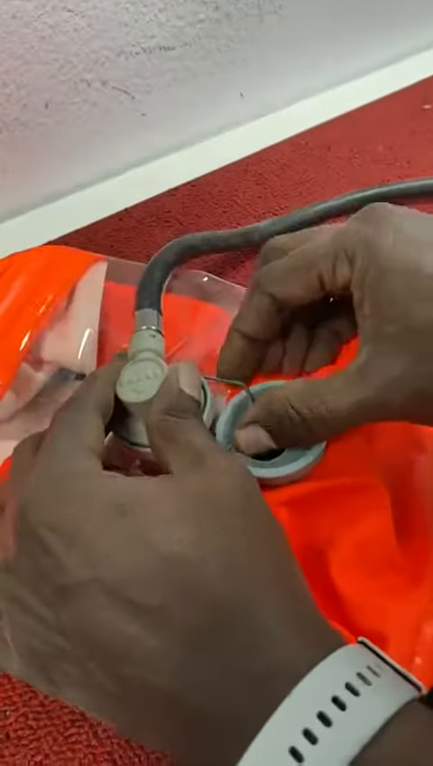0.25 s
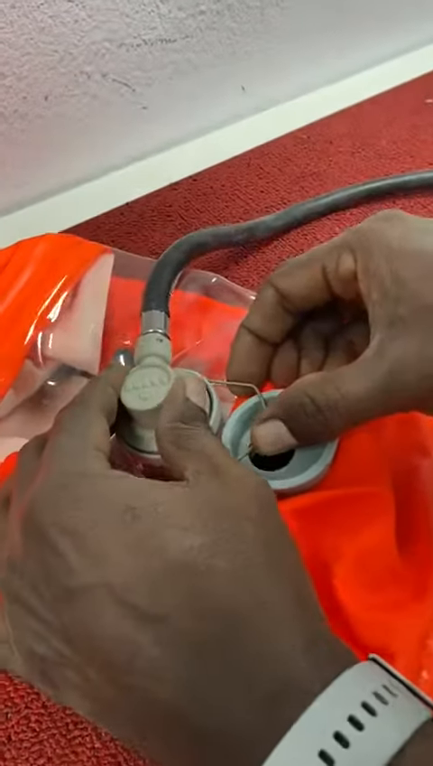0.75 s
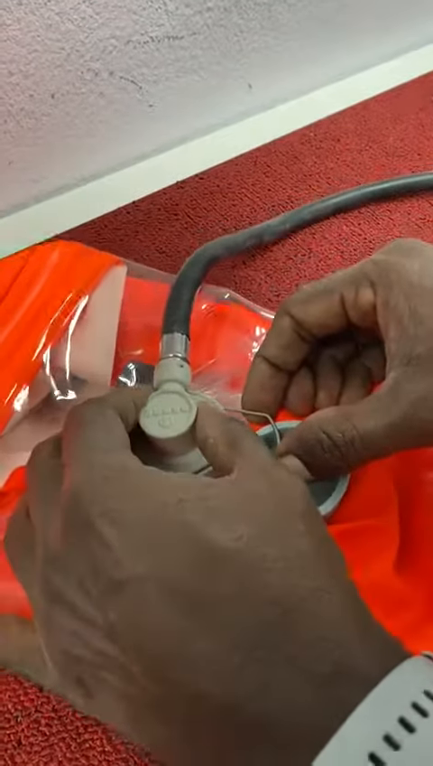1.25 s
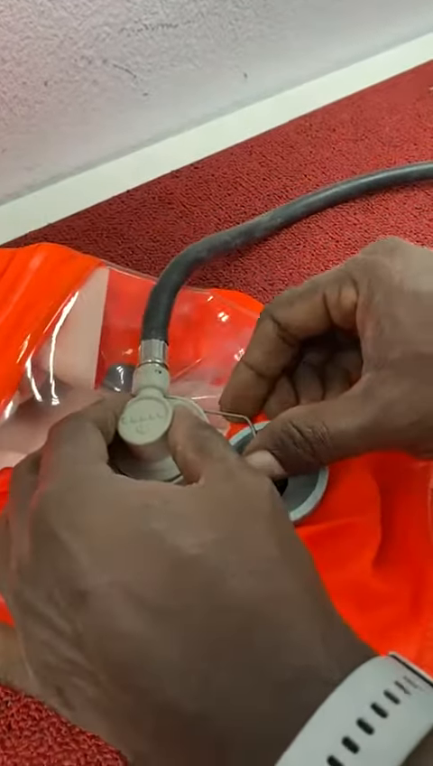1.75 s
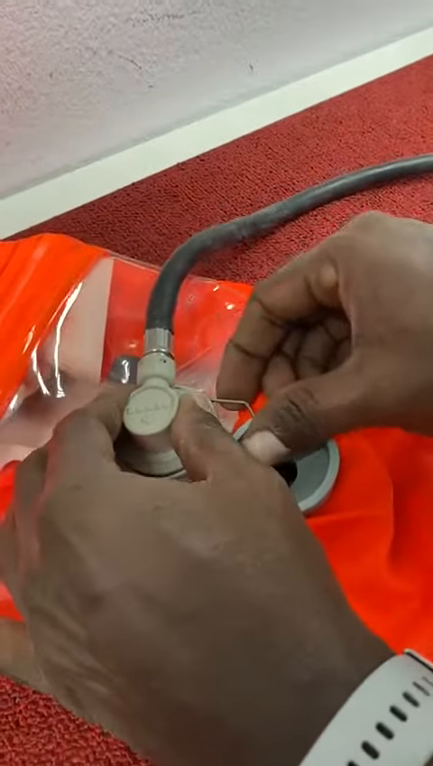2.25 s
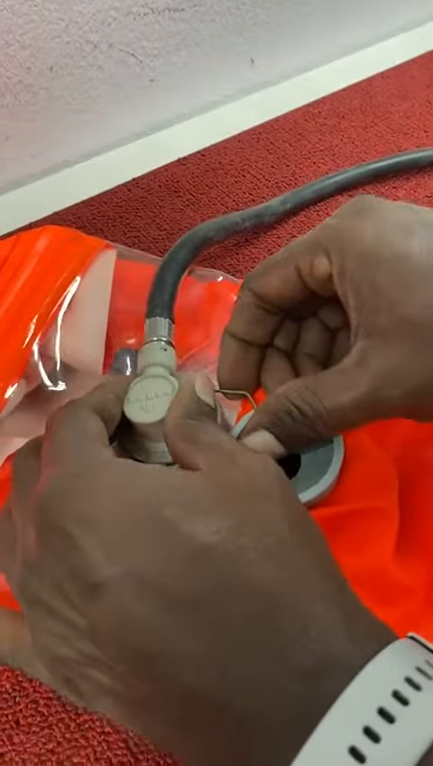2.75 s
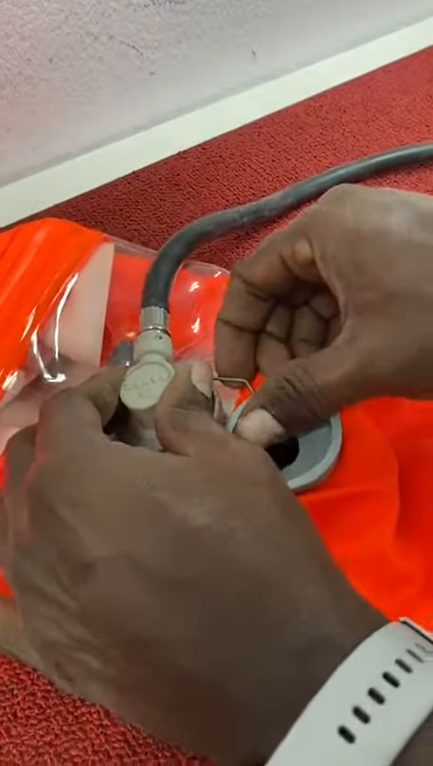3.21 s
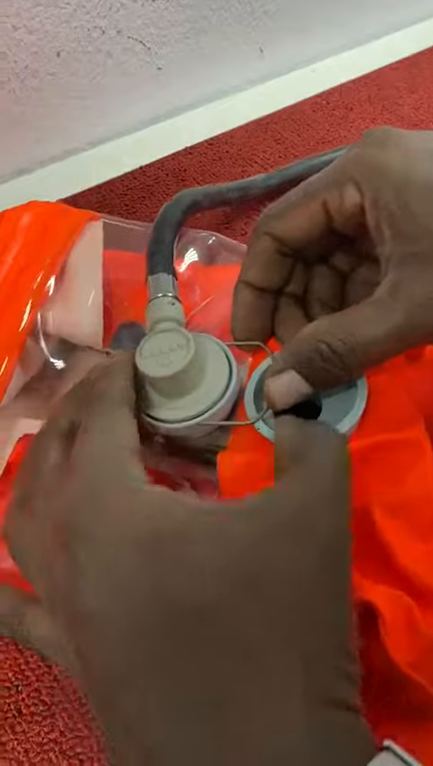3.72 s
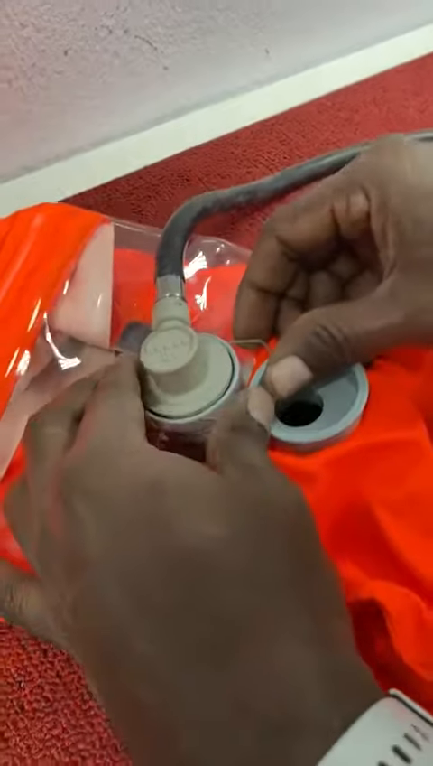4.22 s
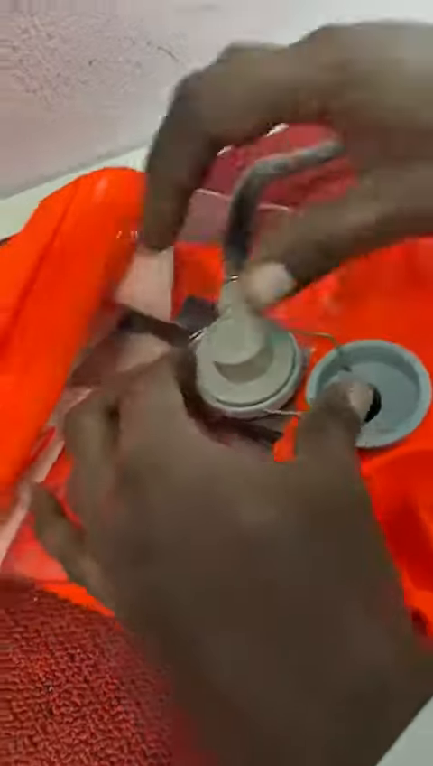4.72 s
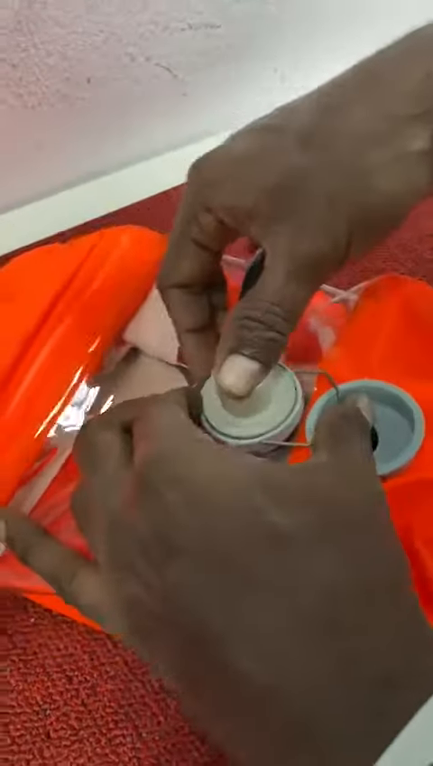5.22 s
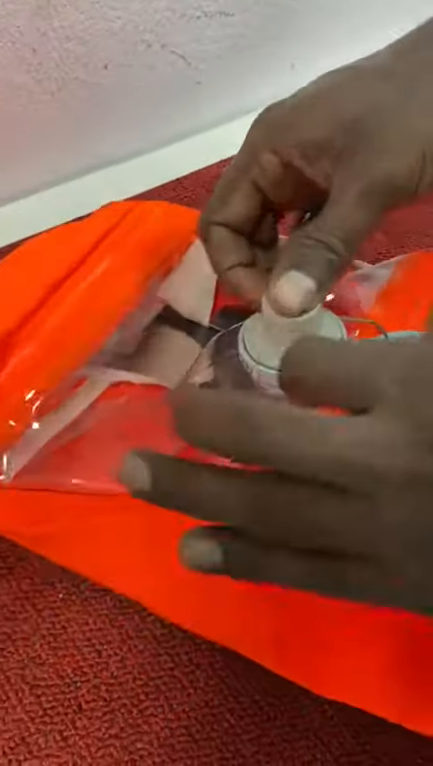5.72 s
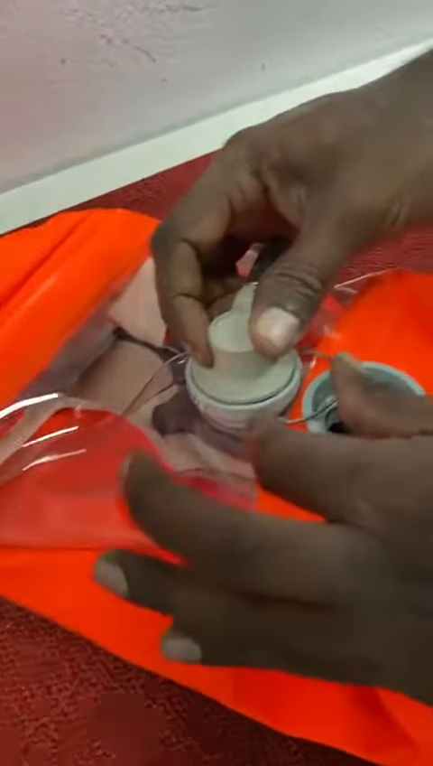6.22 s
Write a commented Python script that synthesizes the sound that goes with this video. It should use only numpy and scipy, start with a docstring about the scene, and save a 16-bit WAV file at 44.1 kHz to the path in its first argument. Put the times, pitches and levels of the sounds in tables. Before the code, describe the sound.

A low ventilation hum fills a carpeted room for the whole six and a half seconds. It holds its pitch but swells and fades unevenly, over a deeper drone and a steady bed of air rumble and hiss. It dips around 1 second and is strongest from about 3.5 to 5.5 seconds, when a faint high whir joins it.

Close to the microphone, hands work a plastic valve on an inflatable vest. A soft knock and slight vinyl rustle come at 1.3 seconds. At 1.9 seconds a wire clip gives a sharp, dry click, the most prominent sound. A faint knock and tick follow near 3.4 and 3.8 seconds. Light plastic knocks cluster between 4.5 and 5 seconds, then a second, quieter click lands at 5.2. A soft knock and tiny squeak follow around 5.5, and a faint rustle at 6. Finger brushes on the fabric are barely audible.

```python
"""Ventilation hum and a vest valve

A ventilation machine hums in a carpeted room; its low tones swell and fade as the microphone
shifts through the standing waves. Under it lies a steady bed of air rumble and hiss.
Close by, hands work a plastic valve on an inflatable vest: a wire clip ticks, the plastic
parts knock and squeak softly, the vinyl rustles and fingers brush the coated fabric."""
import sys
import numpy as np
from scipy import signal
from scipy.fft import rfft, irfft, next_fast_len
from scipy.io import wavfile
from scipy.ndimage import uniform_filter1d, map_coordinates

SR = 44100
rng = np.random.default_rng(int(sys.argv[2]) if len(sys.argv) > 2 else 0)


def unload_wav(signal):
    """Save mono or channel-first audio to the path in sys.argv[1] as 16-bit WAV at rate SR, clipped to [-1, 1]."""
    wavfile.write(
        sys.argv[1],
        SR,
        np.round(np.clip(np.atleast_2d(signal).T, -1, 1) * 32767).astype(np.int16),
    )


N = 284886

# swells of the main tone in the room's standing waves: t/s, level/dB
HUM_SWELLS = [(0, -32.5), (0.12, -33.5), (0.32, -42.5), (0.42, -31), (0.54, -42), (0.72, -35), (0.85, -60),
              (1.16, -46), (1.32, -36), (1.46, -42.5), (1.55, -32.5), (1.66, -34), (1.76, -40),
              (1.88, -29.5), (2.25, -34), (2.38, -39), (2.56, -39.5), (2.66, -37), (2.85, -31.5),
              (3.1, -30.5), (3.35, -30), (3.58, -27.5), (3.85, -31), (4.12, -27), (4.3, -27.5), (4.47, -34),
              (4.62, -26.5), (4.85, -28), (5.14, -26), (5.33, -27.5), (5.48, -25.5), (5.6, -30.5),
              (5.76, -28.5), (5.86, -34.5), (5.97, -41), (6.08, -39.5), (6.2, -35), (6.3, -44), (6.46, -33)]
# swells of its octave, whose standing waves lie elsewhere: t/s, level/dB
OCTAVE_SWELLS = [(0.0, -54.5), (.3, -43), (0.58, -43), (.8, -42), (1.06, -56), (1.32, -46), (1.78, -53),
                 (1.95, -45.5), (2.26, -40), (2.46, -57), (2.62, -64), (2.74, -46.5), (3.1, -40.5),
                 (3.52, -43), (3.7, -46.5), (4.24, -49), (4.58, -44), (4.76, -53), (5.1, -43),
                 (5.32, -54.5), (5.7, -40), (6.1, -39.5), (6.2, -59), (6.36, -39), (6.46, -42)]
# swells of the deeper drone: t/s, level/dB
DRONE_SWELLS = [(0, -49), (.4, -39.5), (.7, -46.5), (1.02, -37), (1.22, -45.5), (1.48, -36), (1.86, -47),
                (2.04, -31), (2.22, -60), (2.98, -46.5), (3.16, -35), (3.54, -39.5), (3.68, -53.5),
                (4.06, -36), (4.28, -47), (4.48, -33), (4.72, -43.5), (4.92, -34), (5.26, -44.5),
                (5.55, -38.5), (5.85, -45), (6.0, -32.5), (6.22, -42), (6.46, -40.5)]

# ticks of the wire clip: t/s, snap level/dB, body level/dB
CLIP_TICKS = [(1.9011, -14.5, -6.5), (1.908, -33.5, -14), (1.911, -33, -21.5), (3.8022, -43, -42.5),
              (4.5696, -33, -47), (4.939, -39, -41), (5.2034, -25, -9.5)]
# bright snap of the wire: f/Hz, gain/dB
SNAP_EQ = [(2500, -4), (3800, 1.5), (5100, 7), (5900, 1.5), (6500, 0), (7200, -7), (8200, 0.5), (9400, 0),
           (10400, 3), (11200, -3), (11900, -16)]
# dry crack of the valve body: f/Hz, gain/dB
BODY_EQ = [(400, -2), (800, -1), (1500, -0.5), (2200, 0), (3700, -3.5), (5100, -6), (6300, -17),
           (8000, -29.5)]
# soft knocks of the plastic parts: t/s, level/dB, f/Hz, attack/s
VALVE_KNOCKS = [(1.3285, -27, 564, 0.0011), (1.348, -41, 780, 0.00085), (3.445, -37, 641, 0.0015),
                (4.47, -32, 630, .0012), (4.507, -35.5, 850, 0.0028), (4.559, -42, 1000, 0.0023),
                (4.584, -38, 860, .002), (4.815, -39, 640, 0.0022), (4.836, -35, 606, 0.0019),
                (4.865, -35, 580, .002), (4.936, -35, 890, 0.0029), (5.462, -36, 580, 0.0014)]
# modes of the plastic: multiple of the knock's pitch, gain/dB
PLASTIC_MODES = [(.6, 4), (1, 7), (1.37, -10), (2.1, -27.5)]
# plastic slipping on plastic: t/s, half-length/s, level/dB, f/Hz
VALVE_SQUEAKS = [(5.575, 0.0077, -40, 800)]
# the vinyl shifting under the hands: t/s, half-length/s, level/dB
VINYL_RUSTLES = [(1.343, 0.034, -54), (4.547, 0.035, -71), (4.67, 0.025, -49.5), (5.223, 0.043, -57),
                 (5.45, 0.034, -61), (6.055, 0.021, -48)]
# colour of the flexing vinyl: f/Hz, gain/dB
VINYL_EQ = [(1200, -19.5), (2000, -10.5), (2650, 1.5), (3050, 2), (3350, -4.5), (4200, -12.5),
            (5500, -31.5), (7000, -78)]
# finger strokes on the fabric: t/s, half-length/s, level/dB
FINGER_BRUSHES = [(0.396, 0.35, -75.5), (1.506, 0.19, -80.5), (1.95, 0.05, -75.5), (3.378, 0.033, -71),
                  (3.794, 0.019, -65.5), (3.972, 0.013, -71), (4.585, 0.047, -69.5), (4.875, 0.14, -75),
                  (5.577, 0.13, -75)]

# duct rumble: f/Hz, gain/dB
RUMBLE_EQ = [(20, -25.5), (36, -14.5), (48, -6), (75, 1), (102, -3), (130, 2.5), (162, 0), (210, -5.5),
             (280, -5), (345, -10.5), (420, -18), (600, -31), (1000, -86.5)]
# grille hiss: f/Hz, gain/dB
HISS_EQ = [(250, -15.5), (450, 7.5), (760, 6.5), (900, 5), (1200, 7), (1350, 4), (2100, 2.5), (2700, 5.5),
           (3050, 4.5), (3400, 2), (4200, -5.5), (5200, -10.5), (6200, -19), (7300, -90.5)]
# whir around 3 kHz: f/Hz, gain/dB
WHIR_EQ = [(2480, -19.5), (2600, -5), (2680, 3.5), (2780, 2.5), (2860, -4.5), (2960, 5.5), (3060, 2),
           (3170, 0.5), (3270, -17), (3600, -54.5)]
# rise and fall of the whir: t/s, level/dB
WHIR_SWELL = [(0, -68), (3.2, -65.5), (3.8, -55.5), (4.7, -55), (5.3, -55.5), (6.2, -56.5), (6.46, -67)]
# top-end fizz of both the air and the fingers: f/Hz, gain/dB
FIZZ_EQ = [(5000, -26.5), (7500, -29), (8500, 2), (9200, 11.5), (10200, 9.5), (11200, 5), (11900, -6.5)]
# thin hiss, in opposite phase left and right: f/Hz, gain/dB
WIDE_EQ = [(5400, -34), (5900, 3), (6400, 3), (7500, 0.5), (8800, -3.5), (9300, -25), (9700, -37.5)]
# faint, narrow resonances of the machine: f/Hz, width/Hz, level/dB
RESONANCES = [(47, 13, -49), (66.2, 10, -47), (187.3, 8.3, -47.5), (234.8, 6.6, -53.5), (342.8, 12, -56.5),
              (433, 20, -58.5), (744, 100, -62), (798.5, 16, -59), (1019, 12, -69), (1232, 25, -62),
              (1460, 27, -64), (1959, 22, -63), (2665, 45, -65.5), (2960, 25, -59.5), (3134, 40, -69.5)]

# how alike the room noise is left and right: f/Hz, correlation
ROOM_CORRELATION = [(70, 1), (100, .99), (190, .96), (280, .93), (400, .75), (600, .56), (950, .58),
                    (1350, .42), (2060, .6), (3000, .58), (4500, .56), (5400, .9), (9500, .99)]
# balance of the room noise: f/Hz, left minus right/dB
ROOM_BALANCE = [(110, -.2), (190, .3), (350, -4.5), (600, -4), (1100, 1), (3500, .8), (6400, 0)]
# bands of the machine that arrive on the left first: f/Hz, phase lead/rad
LEFT_LEAD = [(70, 0), (145, .03), (300, .08), (700, .7), (950, .4), (1650, 1.25), (2030, .45), (2400, 1.35),
             (3100, 1.45), (4500, .8), (5500, 0)]


def machine_hum(pitch_hz=145, drift_hz=0.31, flutter_db=1.5, octave_flutter_db=0.9):
    """Tone and octave share one nearly constant machine speed; each swells with its own standing waves."""
    phase = running_phase(pitch_hz + drift_hz * wobble(1.507)) + 0.027 * wobble(11)
    octave_phase = 2 * phase + 0.081 * wobble(22)
    main = amp(envelope(HUM_SWELLS) + flutter_db * wobble(15)) * unit(np.sin(phase))
    octave = amp(envelope(OCTAVE_SWELLS) + octave_flutter_db * wobble(12)) * unit(np.sin(octave_phase))
    return panned(main, lean_db=-1) + panned(octave, lean_db=-3.5)


def deep_drone(pitch_hz=87.16, wander_hz=2, waver_db=0.8):
    """A deep tone under the hum, wavering in pitch and strength."""
    phase = running_phase(pitch_hz + wander_hz * wobble(9))
    return amp(envelope(DRONE_SWELLS) + waver_db * wobble(9)) * unit(np.sin(phase))


def clip_ticks(rattle_db=-6.5, rattle_t60_s=0.0055, tail_db=-41, tail_t60_s=0.1):
    t = np.arange(SR // 8) / SR
    jolt = signal.unit_impulse(len(t))
    rattle = amp(rattle_db - 60 * t / rattle_t60_s) * (1 - np.exp(-t / 0.00033))
    tail = amp(tail_db - 60 * t / tail_t60_s)
    snaps, cracks = np.zeros(N), np.zeros(N)
    for start, snap_db, body_db in CLIP_TICKS:
        snap = jolt + (rattle + tail) * rng.standard_normal(len(t))
        crack = jolt + rattle * rng.standard_normal(len(t))
        add(snaps, start, amp(snap_db) * snap / np.linalg.norm(snap))
        add(cracks, start, amp(body_db) * crack / np.linalg.norm(crack))
    wire = filtered(snaps, lambda hz: amp(along(SNAP_EQ, hz)))
    body = filtered(cracks, lambda hz: 1j * amp(along(BODY_EQ, hz)))  # a quarter cycle off the wire
    return panned(wire + body, lean_db=0)


def valve_knocks(ring_t60_s=0.018, scuff_db=-7, scuff_t60_s=0.05):
    """Plastic parts knock and scuff, each with its own pitch and softness, all dying equally fast."""
    t = np.arange(SR // 8) / SR
    track = np.zeros(N)
    for start, db, pitch_hz, attack_s in VALVE_KNOCKS:
        ring = np.zeros(len(t))
        for ratio, mode_db in PLASTIC_MODES:  # higher modes die sooner
            decay = amp(mode_db + rng.normal(0, 1) - 60 * t * np.sqrt(ratio) / ring_t60_s)
            ring += decay * np.sin(2 * np.pi * pitch_hz * ratio * t)
        rub = amp(scuff_db - 60 * t / scuff_t60_s) * scuff(pitch_hz, len(t))
        attack = 1 - np.exp(-(t / attack_s) ** 2)
        add(track, start, amp(db) * attack * (ring + rub))
    return panned(track, lean_db=-5)


def valve_squeaks(waver_hz=60, rough_db=4, rub_db=-11):
    """The valve turns in its seat: a few rough stick-slip cycles inside a longer, dull rub."""
    track = np.zeros(N)
    for centre, half_s, db, pitch_hz in VALVE_SQUEAKS:
        phase = running_phase(pitch_hz + waver_hz * wobble(400))
        track += stroke(centre, half_s, db) * amp(rough_db * wobble(760)) * np.sin(phase)
        track += stroke(centre, 2 * half_s, db + rub_db) * scuff(pitch_hz, N)
    return panned(track, lean_db=-6)


def vinyl_rustles():
    """The vinyl flexes in soft swells of noise."""
    return sum(stroke(*row) for row in VINYL_RUSTLES) * room_noise(VINYL_EQ)


def finger_brushes(grain_db=3):
    """Skin slides over coated fabric in faint, grainy strokes."""
    friction = unit(amp(grain_db * wobble(250)) * room_noise(FIZZ_EQ))
    return sum(stroke(*row) for row in FINGER_BRUSHES) * friction


def airflow(rumble_db=-37, hiss_db=-45.5, fizz_db=-78.5, wide_db=-70):
    """The bed of moving air: duct rumble, grille hiss, a patchy whir and a thin, wide top."""
    rumble = amp(rumble_db + 1.5 * wobble(5)) * room_noise(RUMBLE_EQ)
    hiss = amp(hiss_db + 0.25 * wobble(13)) * room_noise(HISS_EQ)
    whir = amp(envelope(WHIR_SWELL) + wobble(4.1)) * patchy(room_noise(WHIR_EQ), depth_db=2.2)
    fizz = amp(fizz_db + 0.8 * wobble(11)) * room_noise(FIZZ_EQ)
    wide = amp(wide_db) * unit(filtered(rng.standard_normal(N), lambda hz: amp(along(WIDE_EQ, hz))))
    return rumble + hiss + whir + fizz + np.array([wide, -wide])


def machine_resonances():
    """The flow keeps the machine's narrow resonances ringing."""
    def peaks(hz):
        return np.sqrt(sum(amp(db) ** 2 / width / (1 + (2 * (hz - centre) / width) ** 4)
                           for centre, width, db in RESONANCES))
    total_rms = np.sqrt(sum(amp(db) ** 2 for _, _, db in RESONANCES))
    return total_rms * diffuse(peaks)


def room_noise(eq):
    """Diffuse noise coloured by an EQ table."""
    return diffuse(lambda hz: amp(along(eq, hz)))


def diffuse(colour):
    """Stereo noise of rms 1: nearly mono in the bass and at the very top, wider in between."""
    def mid_side_gains(hz):
        angle = np.arccos(np.clip(along(ROOM_CORRELATION, hz), -1, 1)) / 2
        return colour(hz) * np.array([np.cos(angle), np.sin(angle)])
    mid, side = filtered(rng.standard_normal((2, N)), mid_side_gains)
    left_right = np.array([mid + side, mid - side])
    return unit(filtered(left_right, lambda hz: panned(1, along(ROOM_BALANCE, hz))))


def patchy(x, depth_db):
    """x at rms 1 with patches of random gain, about 150 Hz wide and 60 ms long."""
    spectra = signal.stft(x, nperseg=1024)[2]
    patches = uniform_filter1d(rng.standard_normal(spectra.shape[1:]), size=4, axis=0)
    patches = uniform_filter1d(patches, size=5, axis=1)
    return unit(signal.istft(spectra * amp(depth_db * unit(patches)), nperseg=1024)[1][:, :N])


def scuff(pitch_hz, size):
    """Dull rubbing noise of rms 1 around a pitch."""
    band = signal.butter(3, [pitch_hz * 0.6, pitch_hz * 1.5], "bandpass", fs=SR, output="sos")
    return unit(signal.sosfilt(band, rng.standard_normal(size)))


def stroke(centre_s, half_s, db):
    """The bell-shaped gain of one hand movement."""
    return amp(db) * np.exp(-((np.arange(N) / SR - centre_s) / half_s) ** 2 / 2)


def amp(db):
    """Decibels to gain."""
    return 10 ** (np.asarray(db) / 20)


def unit(x):
    """x at rms 1."""
    return x / np.sqrt(np.mean(x ** 2) + 1e-20)


def along(points, hz):
    """A table of f/Hz, value read on a log frequency axis."""
    freqs, values = np.transpose(points)
    return np.interp(np.log(hz + 1), np.log(freqs + 1), values)


def envelope(points):
    """A table of t/s, level/dB drawn out to one level per sample."""
    return np.interp(np.arange(N) / SR, *np.transpose(points))


def wobble(rate):
    """A smooth random curve, rate knots a second."""
    knots = rng.standard_normal(int(N * rate / SR) + 4)
    return map_coordinates(knots, [np.arange(N) * rate / SR])


def running_phase(hz):
    """The phase of a moving pitch, in radians."""
    return 2 * np.pi * np.cumsum(hz) / SR


def filtered(x, response):
    """x through a frequency response."""
    size = next_fast_len(N + SR // 2)
    return irfft(rfft(x, size) * response(np.fft.rfftfreq(size, 1 / SR)), size)[..., :N]


def panned(x, lean_db):
    """A mono sound, louder on the left by lean_db."""
    return np.array([x * amp(lean_db / 2), x * amp(-lean_db / 2)])


def add(track, start_s, sound):
    """Mix a short sound into the track."""
    part = track[max(round(start_s * SR), 0):][:len(sound)]
    part += sound[:len(part)]


def scene():
    """The machine and its air, arriving on the left first, with the small, close sounds of the hands."""
    machine = machine_hum() + deep_drone() + airflow() + machine_resonances()
    sides = np.array([[1], [-1]])
    machine = filtered(machine, lambda hz: np.exp(0.5j * along(LEFT_LEAD, hz) * sides))
    return machine + clip_ticks() + valve_knocks() + valve_squeaks() + vinyl_rustles() + finger_brushes()


def record(dry):
    """The phone keeps nothing above its band limit of 11.9 kHz."""
    return filtered(dry, lambda hz: hz < 11900)


dry = scene()
out = record(dry)
unload_wav(out)
```